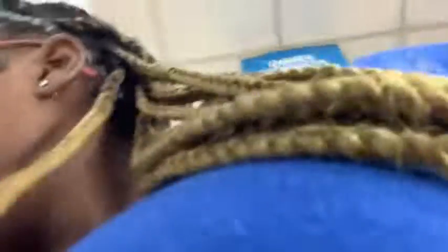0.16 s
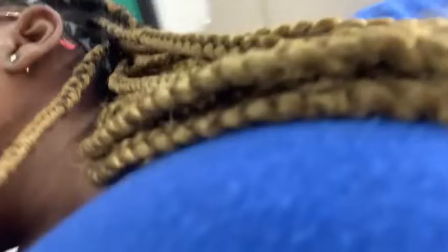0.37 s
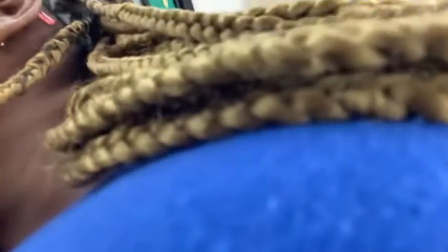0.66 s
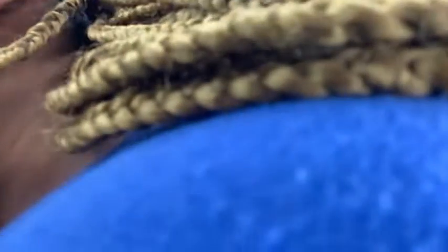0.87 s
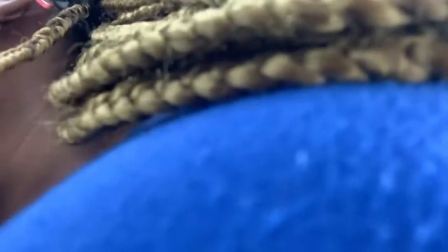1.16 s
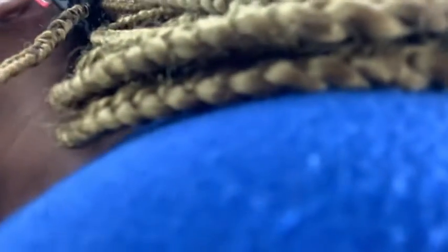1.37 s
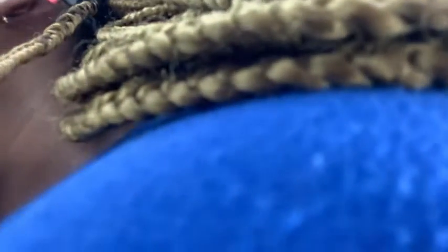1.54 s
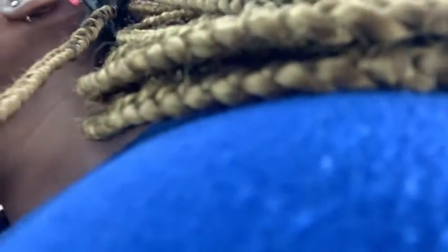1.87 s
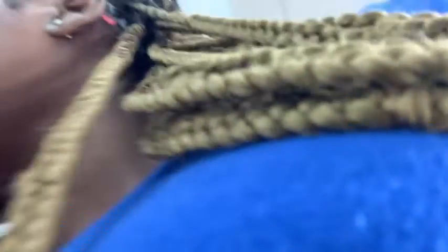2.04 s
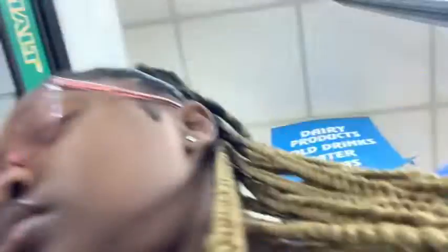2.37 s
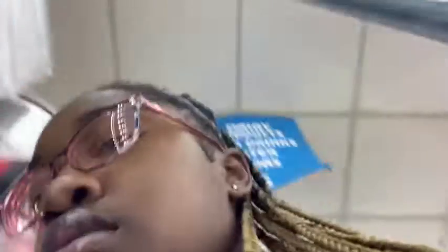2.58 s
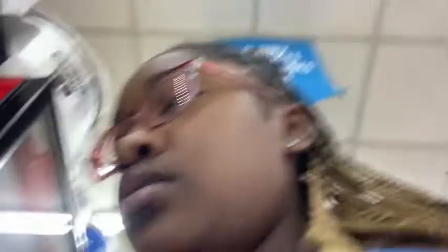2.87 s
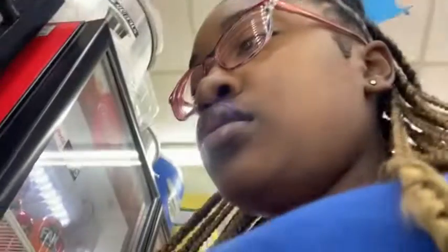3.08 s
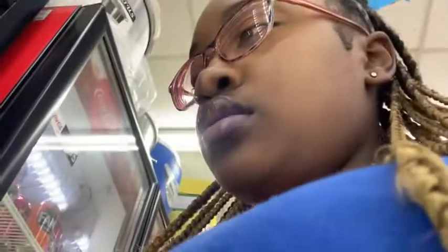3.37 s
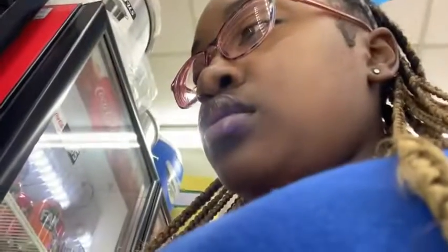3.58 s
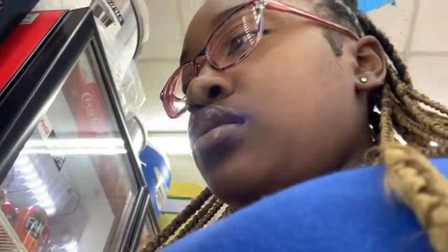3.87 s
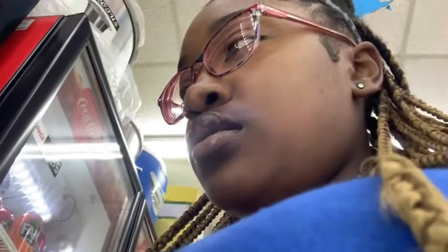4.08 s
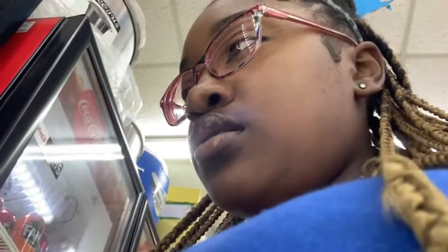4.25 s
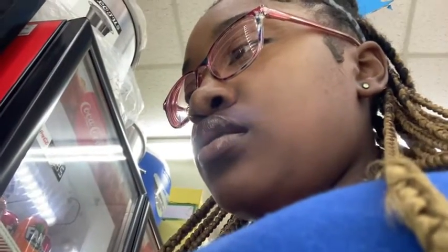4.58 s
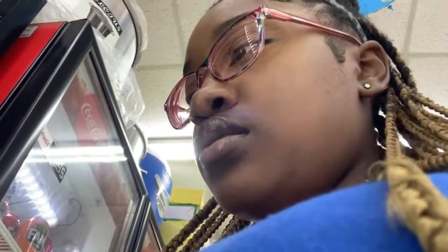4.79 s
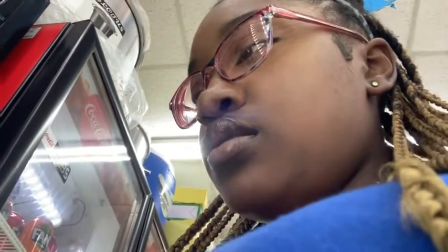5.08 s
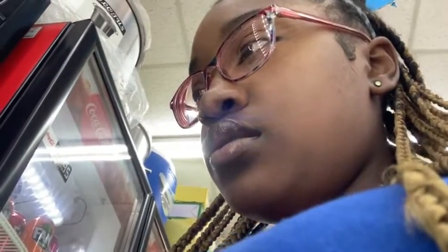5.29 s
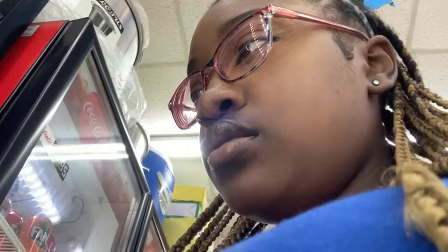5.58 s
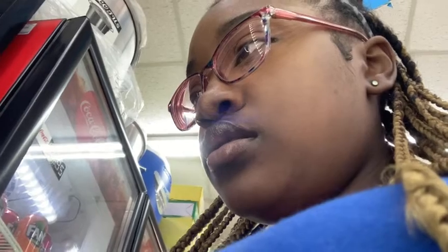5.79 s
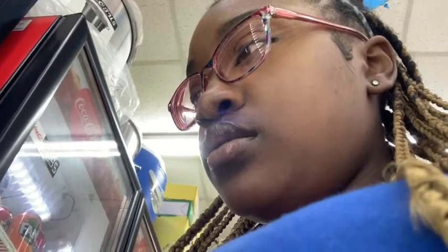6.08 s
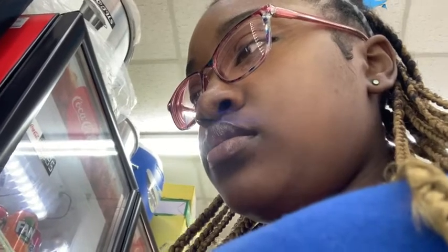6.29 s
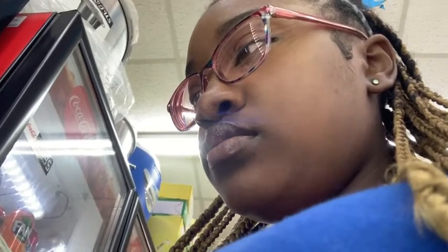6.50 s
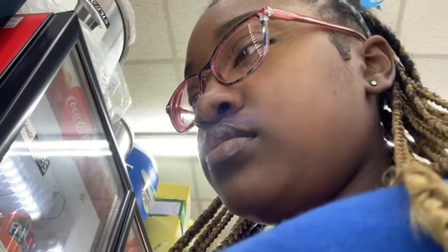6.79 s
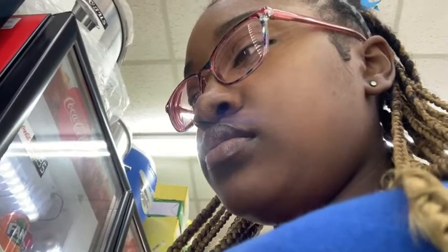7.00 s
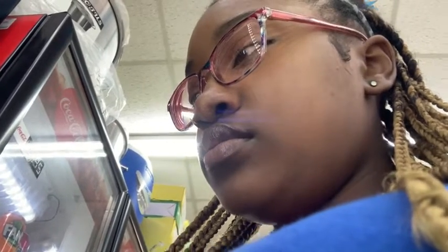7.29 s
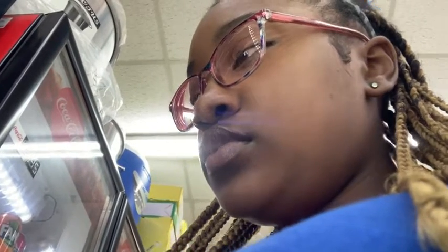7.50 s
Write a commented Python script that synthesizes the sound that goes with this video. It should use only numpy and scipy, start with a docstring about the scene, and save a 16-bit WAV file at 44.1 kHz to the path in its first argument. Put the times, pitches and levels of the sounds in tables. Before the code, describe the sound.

A glass-door drinks cooler drones steadily in a shop, with one hollow knock early on, a cloth rub and a few light handling ticks.

```python
"""A glass-door drinks cooler hums in a shop: lines of two fans, two compressors and nearby motors under filtered-noise air.
The air throbs faintly, a small motor whines and the grille chirps in thin tones of unsteady pitch.
A phone, tucked toward a shoulder, turns out to the cooler: tucked in, the drone is strong and the treble shaded.
Early on a hollow body knocks and settles (damped modes, noise crack, low thud), a sleeve slides (coloured noise)
and light ticks follow (short band-noise bursts)."""
import sys
import numpy as np
from scipy import signal
from scipy.fft import rfft, irfft, next_fast_len
from scipy.io import wavfile
from scipy.ndimage import map_coordinates

SR = 44100
rng = np.random.default_rng(int(sys.argv[2]) if len(sys.argv) > 2 else 0)


def unload_audio(sound):
    """Save the sound as a 16-bit wav file, at the path given as the first command line argument."""
    columns = np.transpose(np.atleast_2d(sound))
    # keep every value between -1 and 1, then stretch to whole-number steps
    steps = np.round(np.clip(columns, -1, 1) * 32767)
    wavfile.write(sys.argv[1], SR, steps.astype(np.int16))


N = 336483

FAN_HZ, THROB_HZ = 24.8, 8.54
# one throb crest and one fan push at the grille
GRILLE_CREST_S, GRILLE_PUSH_S = 5.022, 3.014


def amp(db):
    """Decibels to gain."""
    return 10 ** (np.asarray(db) / 20)


def unit(x):
    """Scale to rms 1."""
    return x / np.sqrt(np.mean(x ** 2) + 1e-20)


def along(points, hz):
    """Read (f/Hz, value) points on a log frequency axis."""
    f, v = np.transpose(points)
    return np.interp(np.log(hz + 1), np.log(f + 1), v)


def clock():
    """Time of every sample, s."""
    return np.arange(N) / SR


def curves(rows):
    """One value per sample for each column after the time."""
    s, *cols = np.transpose(rows)
    return [np.interp(clock(), s, c) for c in cols]


def wobble(rate):
    """Smooth random curve, rate knots per second."""
    knots = rng.standard_normal(int(N * rate / SR) + 4)
    coarse = np.arange(0, N, 32)
    values = map_coordinates(knots, [coarse * rate / SR + 1])
    return np.interp(np.arange(N), coarse, values)


def filtered(x, response):
    """Apply a response of frequency by FFT, zero-padded."""
    n = x.shape[-1]
    m = next_fast_len(n + 8192)
    return irfft(rfft(x, m) * response(np.fft.rfftfreq(m, 1 / SR)), m)[..., :n]


def add(track, s, sound):
    """Mix a sound into a track at time s."""
    start = round(s * SR)
    track[..., start:start + sound.shape[-1]] += sound


def at_ports(pair):
    """Diffuse field at two ports: mid and side shares of unrelated signals set the likeness by frequency."""
    # f/Hz, likeness 0-1
    likeness = [(150, 1), (350, 0.95), (500, 0.6), (750, 0.61), (1400, 0.46), (2500, 0.19), (4500, 0.98),
                (9000, 1)]

    def mid_side_gain(hz):
        turn = np.arccos(np.clip(along(likeness, hz), -1, 1)) / 2
        return np.array([np.cos(turn), np.sin(turn)])

    mid, side = filtered(pair, mid_side_gain)
    return np.array([mid + side, mid - side])


def rush(spectrum):
    """Stereo turbulence: Gaussian noise shaped by a density in dB per Hz."""
    noise = rng.standard_normal((2, N))
    return at_ports(filtered(noise, lambda hz: amp(along(spectrum, hz)) * np.sqrt(SR / 2)))


def tucked():
    """How far the phone is turned in toward the shoulder, 0-1."""
    # t/s, tuck 0-1
    turn = [(0, 0.16), (.4, 0.74), (1.1, 0.79), (1.8, 0.95), (2.2, 0.46), (2.5, 0.37), (2.75, 0)]
    return np.clip(curves(turn)[0], 0, 1)


def rotor(rate_hz, orders, drift_rad, waver_db):
    """Lines locked to one shaft: its angle drifts and each line wavers in level."""
    angle = 2 * np.pi * rate_hz * clock() + drift_rad * wobble(0.922)
    out = 0
    for multiple, db in orders:
        level = amp(db + waver_db * wobble(3.056))
        out = out + level * np.sin(multiple * angle + 2 * np.pi * rng.random())
    return np.sqrt(2) * out


def tones(rows, waver_db):
    """Free-running lines: a wandering phase gives each its width."""
    out = 0
    for hz, width, db in rows:
        phase = 2 * np.pi * (hz * clock() + rng.random()) + wobble(2 * width + .5)
        out = out + np.sqrt(2) * amp(db + waver_db * wobble(width + 2)) * np.sin(phase)
    return out


def steady_tone(hz, zero_s):
    """Sine of rms 1, rising through zero at zero_s."""
    return np.sqrt(2) * np.sin(2 * np.pi * hz * (clock() - zero_s))


def hum(tuck, blade_db, pump_db, other_pump_db):
    """Motor lines: the near-equal blade tones of two fans beat about once a second, as do two compressors."""
    # fan lines: multiple of shaft rate, level/dB
    fan_lines = [(2, -63), (3, -47), (4, -55), (5, -39.5), (6, -49.5), (7, -47), (9, -49.5), (10, -50),
                 (12, -48.5), (14, -50.5), (15, -47.5), (16, -55.5)]
    # second fan: multiple of its shaft rate, level re drone/dB
    twin_lines = [(15, -12), (16, -16), (18.5, -18.5)]
    # compressor overtones: multiple of its rate, level/dB
    pump_overtones = [(2, -49.5), (4, -51.5), (5, -45.5)]
    # other shop motors: f/Hz, width/Hz, level/dB
    motors = [(55.2, .5, -53), (80.5, .3, -40.5), (108, .5, -55), (120, .3, -52), (132.6, .5, -54),
              (153.3, .4, -44), (188.1, .5, -51), (208.8, .5, -49), (240, .5, -52), (305, .5, -53),
              (355, 2, -52), (460, 3, -52.5), (598, 8, -55), (652, 3, -57), (932, 5, -62), (1776, 4, -68)]
    twin_hz, blade_count = 24.924, 8
    compressor_hz, other_pump_hz = 58.28, 57.26
    drone_db, drone_tuck_db, pump_tuck_db = -39.5, 11, 1
    # the paired tones oppose at these moments
    blade_null_s, pump_null_s = 3.0, 3.3

    fan = rotor(FAN_HZ, fan_lines, drift_rad=0.03, waver_db=1.5)
    fan = fan + amp(blade_db) * steady_tone(blade_count * FAN_HZ, blade_null_s)

    twin = rotor(twin_hz, twin_lines, drift_rad=0.073, waver_db=0.0)
    twin = twin - steady_tone(blade_count * twin_hz, blade_null_s)
    twin = amp(drone_db + drone_tuck_db * tuck) * twin

    pumps = amp(pump_db) * steady_tone(compressor_hz, pump_null_s)
    pumps = pumps - amp(other_pump_db) * steady_tone(other_pump_hz, pump_null_s)
    pumps = amp(pump_tuck_db * tuck) * pumps
    overtones = rotor(compressor_hz, pump_overtones, drift_rad=0.022, waver_db=3.0)
    return fan + twin + pumps + overtones + tones(motors, waver_db=3)


def whine():
    """One thin motor tone, its level changing as the phone moves through its standing waves."""
    # t/s, level/dB
    whine_level = [(0, -55), (.3, -65), (1.1, -54), (1.6, -57.5), (2.65, -60), (2.85, -53.5), (4.2, -56),
                   (5.8, -57), (6.7, -54.5), (7.6, -56.5)]
    whine_hz = 1895
    phase = 2 * np.pi * whine_hz * clock() + .5 * wobble(2)
    return np.sqrt(2) * amp(curves(whine_level)[0]) * np.sin(phase)


def swell(crest_s, push_s, throb_db, shaft_db, flutter_db):
    """Airflow in dB: a slow throb of uneven depth, and pushes once and twice per fan turn."""
    flutter_push_s = 2.993
    cycle = lambda hz, peak_s: np.cos(2 * np.pi * hz * (clock() - peak_s))
    throb = cycle(THROB_HZ, crest_s) * (1 + 0.38 * wobble(1.0))
    flutter = cycle(2 * FAN_HZ, flutter_push_s)
    return throb_db * throb + shaft_db * cycle(FAN_HZ, push_s) + flutter_db * flutter


def air(tuck, body_follow, eddy_db):
    """Grille turbulence: higher bands follow the flow more; the shoulder adds a hollow and shades the fizz."""
    # band spectra before band gain: f/Hz, density/dB per Hz
    rumble_spectrum = [(15, -84.5), (36, -75), (52, -53.5), (110, -65), (240, -59), (380, -64),
                       (480, -67.5), (700, -93.5), (1500, -120)]
    body_spectrum = [(250, -100), (450, -69.5), (620, -63), (760, -67), (950, -67.5), (1250, -73.5),
                     (1900, -76), (2300, -81), (4000, -110)]
    hiss_spectrum = [(900, -110), (1800, -97), (2500, -89.5), (3400, -87), (4000, -89), (4600, -100),
                     (5800, -105), (7500, -112), (12000, -130)]
    fizz_spectrum = [(3000, -125), (4700, -106), (5800, -105), (7500, -102.5), (10500, -112.5),
                     (12500, -120), (15500, -130)]
    # hollow between phone and shoulder, fully tucked: f/Hz, density/dB per Hz
    pocket_spectrum = [(600, -90), (800, -66.5), (1100, -74), (1350, -75.5), (1650, -74), (2000, -79.5),
                       (2400, -100), (4000, -130)]
    # band gain facing the cooler, and its change when tucked
    rumble_db, rumble_tuck_db = -1.17, 2
    body_db, body_tuck_db = -4, -0.5
    hiss_db, hiss_tuck_db = 3, 0.5
    fizz_db, fizz_tuck_db = -3.06, -11.5
    fizz_crest_s, fizz_push_s = 5.032, 2.998

    flow_db = swell(GRILLE_CREST_S, GRILLE_PUSH_S, throb_db=1.9, shaft_db=1.33, flutter_db=0.5)
    jet_db = swell(fizz_crest_s, fizz_push_s, throb_db=3.0, shaft_db=5.0, flutter_db=0.8)
    rumble = amp(rumble_db + rumble_tuck_db * tuck) * rush(rumble_spectrum)
    body_level_db = body_db + body_tuck_db * tuck + body_follow * flow_db + eddy_db * wobble(8)
    body = amp(body_level_db) * rush(body_spectrum)
    hiss = amp(hiss_db + hiss_tuck_db * tuck + flow_db) * rush(hiss_spectrum)
    fizz = amp(fizz_db + fizz_tuck_db * tuck + jet_db) * rush(fizz_spectrum)
    return rumble + body + hiss + fizz + tuck * rush(pocket_spectrum)


def whistles(tuck):
    """Grille chirps of straying pitch, strongest where a fan push meets a throb crest."""
    # f/Hz, pitch stray/Hz, relative level/dB
    whistle_lines = [(2290, 9, -9), (2472, 8, 0), (2790, 10, -11), (3272, 9, -2.5), (4032, 10, -15)]
    whistle_db, whistle_tuck_db = -66, -14.5
    push_db = swell(GRILLE_CREST_S, GRILLE_PUSH_S, throb_db=4.2, shaft_db=4.5, flutter_db=2.6)
    lines = 0
    for hz, stray_hz, db in whistle_lines:
        phase = 2 * np.pi * np.cumsum(hz + stray_hz * wobble(40)) / SR
        lines = lines + amp(db + wobble(20)) * np.sin(phase)
    return amp(whistle_db + whistle_tuck_db * tuck + push_db) * np.sqrt(2) * lines


def ring(modes, place, t, spread_rad):
    """Damped modes weighted by contact place; each builds up in about a cycle, port phases part with pitch."""
    out = 0
    for hz, face_db, edge_db, t60 in modes:
        db = np.interp(place, [0, 1], [face_db, edge_db]) + rng.normal(0, 1)
        skew = spread_rad * min(hz / 700, 1) ** 2 * rng.normal() * np.array([[1], [-1]])
        build_up = 1 - np.exp(-(t * hz / 2.06) ** 2)
        out = out + amp(db - 60 * t / t60) * build_up * np.sin(2 * np.pi * hz * t + skew)
    return out


def knock(crack_t60, crack_attack_s, thud_hz, thud_attack_s, thud_t60):
    """A hollow body is hit, rocks onto another edge and settles: each contact cracks, rings and thuds."""
    # t/s, ring gain/dB, crack gain/dB, thud gain/dB, place (0 face - 1 edge)
    contacts = [(0.4848, -12, -21.5, -37, 0.092), (0.4975, -34, -35, -13.5, 0.1),
                (0.5392, -19.5, -29.5, -28.5, 0.72), (0.5434, -16, -35, -30, 0.81),
                (0.568, -16.5, -32.5, -35, 0.88), (0.6, -30, -41, -31, 0.7)]
    # hollow body modes: f/Hz, relative face level/dB, relative edge level/dB, t60/s
    body_modes = [(249.4, 9, -0.5, 0.083), (274.7, 0, 2, 0.14), (420.4, -6.5, -4.5, 0.12),
                  (597, -3, -3.5, 0.096), (674, -8, -6.5, 0.082), (764, -8.5, -13.5, 0.13),
                  (912, -17, -14.5, 0.058), (1250, -16, -18, 0.042)]
    # hard shell modes: f/Hz, relative face level/dB, relative edge level/dB, t60/s
    shell_modes = [(1640, 1, -3, 0.04), (1745, -14, 0, .06), (2015, -6, -6, .035), (2177, -1, -5, .03),
                   (2653, 0, -5, 0.024), (3090, 0, -9, 0.02), (3700, -6, -12, .02)]
    # crack colour: f/Hz, relative level/dB
    crack_colour = [(200, -18), (900, 5), (2200, -1), (3400, -2), (4400, -12), (7500, -22.5), (11000, -27),
                    (15000, -32)]

    out = np.zeros((2, N))
    t = np.arange(SR // 2) / SR
    thud = amp(-60 * t / thud_t60) * (1 - np.exp(-t / thud_attack_s)) * np.sin(2 * np.pi * thud_hz * t)
    for s, ring_db, crack_db, thud_db, place in contacts:
        noise = filtered(rng.standard_normal((2, len(t))), lambda hz: amp(along(crack_colour, hz)))
        noise = amp(-3 - 60 * t / crack_t60) * unit(at_ports(noise))
        shell = amp(4.5) * ring(shell_modes, place, t, spread_rad=0.55)
        crack = (1 - np.exp(-t / crack_attack_s)) * (noise + shell)
        body = ring(body_modes, place, t, spread_rad=0.36)
        add(out, s, amp(ring_db) * body + amp(crack_db) * crack + amp(thud_db) * thud)
    return out


def stroke(start_s, hold_s, attack_s, release_s):
    """Gain of one slide: rises, stays up until hold_s, then falls 60 dB per release_s."""
    t = clock() - start_s
    return np.clip(t / attack_s, 0, 1) * amp(-60 * np.maximum(t - hold_s, 0) / release_s)


def sleeve(grain_db):
    """Cloth drags on the phone: a low rub through the case, and a soft brush in the air that catches."""
    # start/s, hold/s, rub level/dB, brush level/dB
    slides = [(0.539, .06, -37, -46), (0.615, 0.3, -37.5, -63), (1.015, .03, -55, -41.5)]
    # colours of rub and brush: f/Hz, relative level/dB
    rub_colour = [(25, -30), (55, -3), (80, 9), (130, -15), (400, -56)]
    brush_colour = [(600, -23), (2000, 5), (3400, -1.5), (4600, -9), (7000, -22), (10500, -24),
                    (15000, -32)]
    rub_gain, brush_gain = 0, 0
    for start_s, hold_s, rub_db, brush_db in slides:
        slide = stroke(start_s, hold_s, attack_s=.02, release_s=.3)
        rub_gain = rub_gain + amp(rub_db) * slide
        brush_gain = brush_gain + amp(brush_db) * slide
    rub = unit(rush(rub_colour))
    brush = unit(amp(grain_db * wobble(140)) * rush(brush_colour))
    return rub_gain * rub + brush_gain * brush


def ticks():
    """Handling ticks: decaying bright noise bursts, each with a lower click of the phone's case."""
    # t/s, burst level/dB, centre/Hz, width/octave, t60/s, click level/dB, click centre/Hz, click width/octave
    tick_rows = [(.963, -55, 8500, .8, .012, -62, 3000, .6), (1.007, -53, 7500, 1.2, .02, -42, 2800, .7),
                 (1.58, -50, 7000, 2.2, 0.13, -46, 3200, .8), (1.592, -41, 9000, 3.5, 0.09, -33, 3500, .7),
                 (1.9375, -41, 7500, 1.4, 0.006, -54, 3000, .6),
                 (2.5045, -38.5, 6400, .35, 0.014, -26, 3100, .45),
                 (2.5045, -39, 12000, 2, 0.005, -40, 1900, .4),
                 (2.5753, -40, 9200, .5, 0.007, -22.5, 2400, 1.2),
                 (2.583, -62, 7000, 0.95, 0.028, -36, 2650, .45),
                 (2.6998, -35.5, 9500, .4, 0.015, -58, 3000, .6)]
    case_t60 = 0.017
    out = np.zeros(N)
    t = np.arange(SR // 4) / SR

    def band(centre_hz, octaves):
        shape = lambda hz: 1 / (1 + (np.log2((hz + 1) / centre_hz) / octaves) ** 2) ** 2
        return unit(filtered(rng.standard_normal(len(t)), shape))

    for s, db, centre_hz, octaves, t60, click_db, click_hz, click_octaves in tick_rows:
        burst = amp(db - 60 * t / t60) * band(centre_hz, octaves)
        click = amp(click_db - 60 * t / case_t60) * band(click_hz, click_octaves)
        add(out, s, burst + click)
    return out


def shop(x):
    """Room answer: convolution with a noise tail whose treble dies first."""
    # f/Hz, t60/s
    room_decay = [(100, 0.39), (500, 0.21), (3000, 0.16), (12000, 0.1)]
    hz, t, z = signal.stft(rng.standard_normal((2, SR // 2)), SR, nperseg=256)
    decay = amp(-60 * t / along(room_decay, hz)[:, None])
    tail = signal.istft(z * decay, SR, nperseg=256)[1]
    tail = tail / np.linalg.norm(tail[0])
    return at_ports(signal.fftconvolve(x[None], tail, axes=1)[:, :N])


def scene():
    """All but the whistles reach the right port earlier above the bass and mostly louder; whistles are centred."""
    # f/Hz, lag of left port/rad
    left_lag = [(380, 0), (520, 0.81), (750, 1.7), (1800, 1.52), (3000, 2.5), (4700, 3.5), (7800, 5.5),
                (9600, 7.5), (12000, 9), (13500, 9.6), (15500, 11)]
    # f/Hz, right minus left/dB
    right_tilt = [(75, 0), (170, 1.9), (330, 2), (600, -1), (1100, .4), (3000, .1)]

    tuck = tucked()
    cooler = hum(tuck, blade_db=-43.5, pump_db=-41.5, other_pump_db=-46.5)
    cooler = cooler + whine() + air(tuck, body_follow=0.39, eddy_db=0.66)
    blow = knock(crack_t60=0.074, crack_attack_s=0.0025, thud_hz=87.3, thud_attack_s=0.003, thud_t60=0.065)
    cloth = sleeve(grain_db=4)
    handling = ticks()
    room = shop(amp(-7.5) * blow.mean(axis=0) + amp(-6.5) * handling)
    field = cooler + blow + handling + cloth + room

    sides = np.array([[-1], [1]]) / 2  # left, right
    port_response = lambda hz: amp(sides * along(right_tilt, hz)) * np.exp(1j * sides * along(left_lag, hz))
    return filtered(field, port_response) + whistles(tuck)


def record(dry):
    """Treble colour: a dip near 12.8 kHz, partly recovering by 14.5 kHz, and nothing above 15.75 kHz."""
    # f/Hz, gain/dB
    treble_dip = [(11200, -0.5), (12800, -21), (14500, -6)]
    top_hz = 15750
    return filtered(dry, lambda hz: amp(along(treble_dip, hz)) * (hz < top_hz))


dry = scene()
out = record(dry)
unload_audio(out)
```